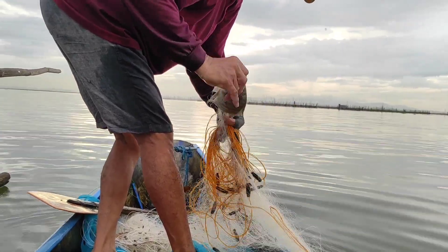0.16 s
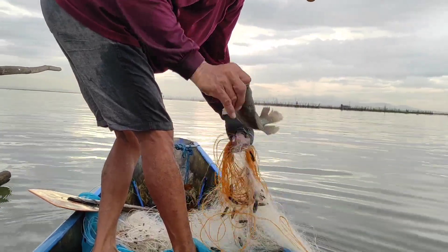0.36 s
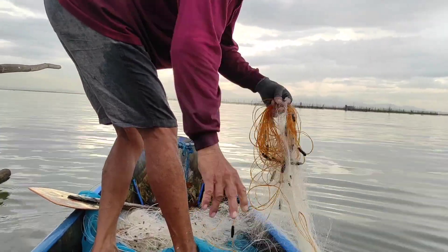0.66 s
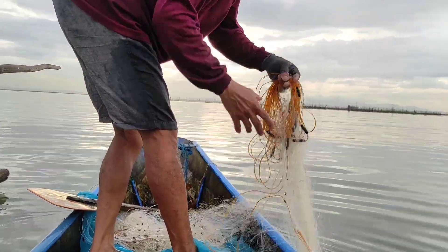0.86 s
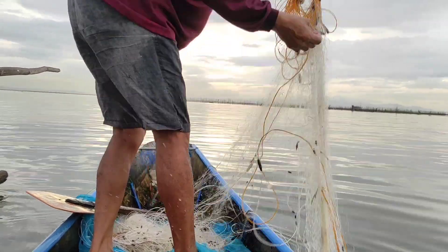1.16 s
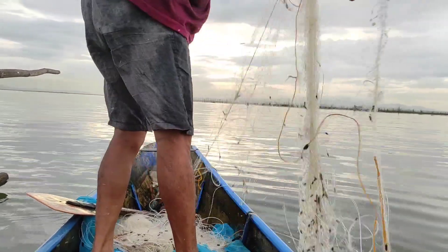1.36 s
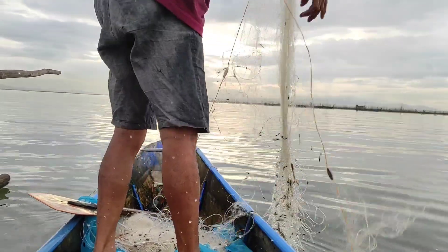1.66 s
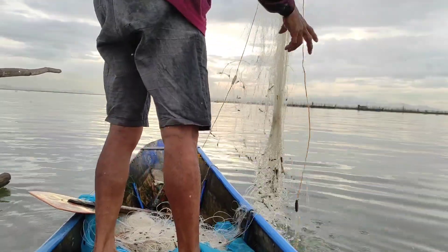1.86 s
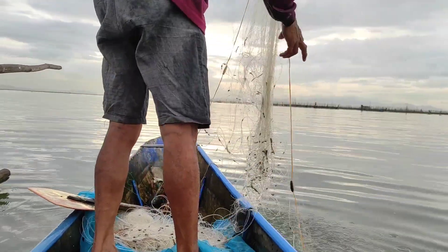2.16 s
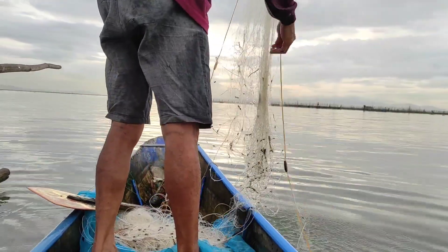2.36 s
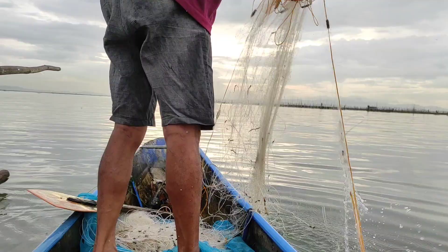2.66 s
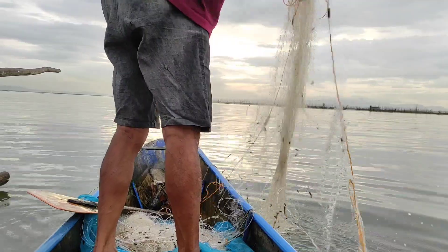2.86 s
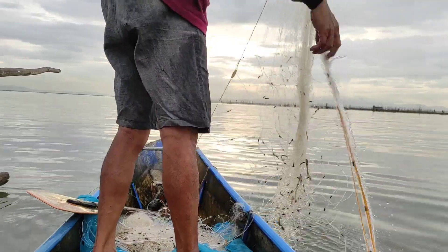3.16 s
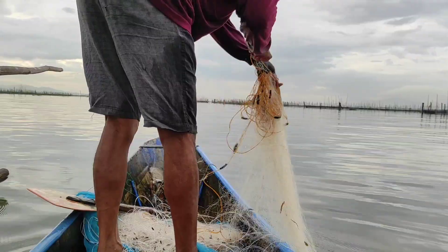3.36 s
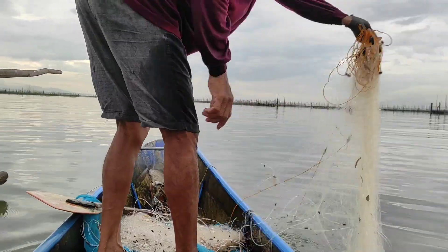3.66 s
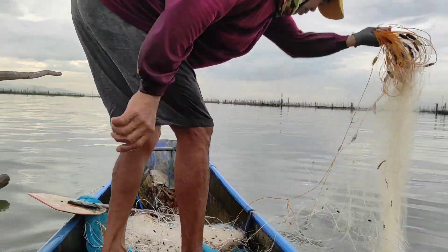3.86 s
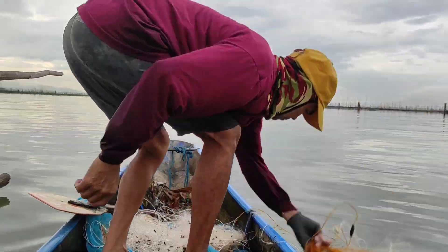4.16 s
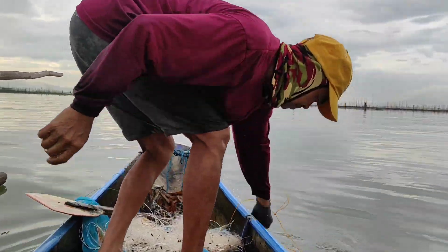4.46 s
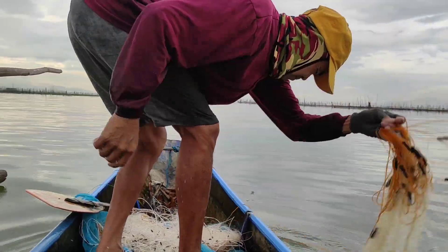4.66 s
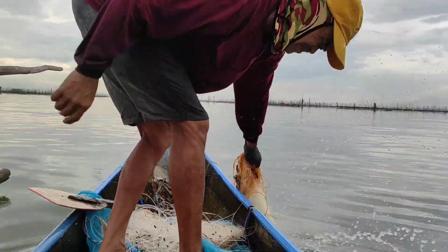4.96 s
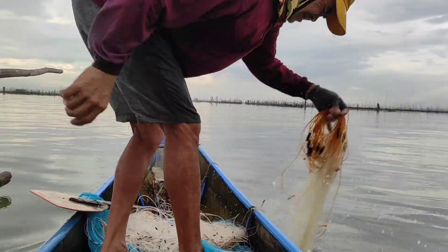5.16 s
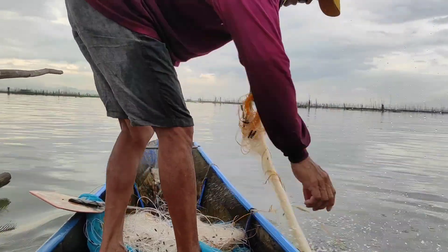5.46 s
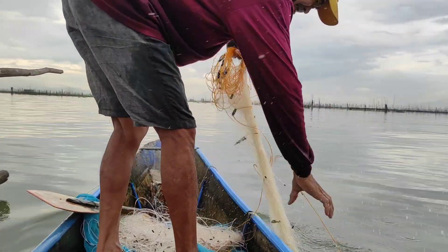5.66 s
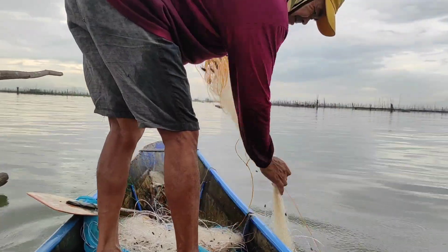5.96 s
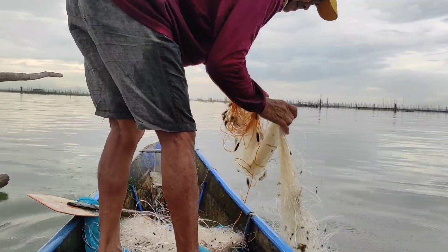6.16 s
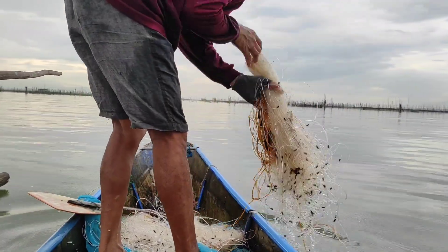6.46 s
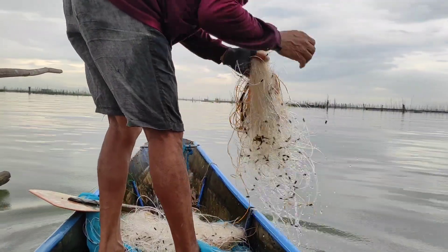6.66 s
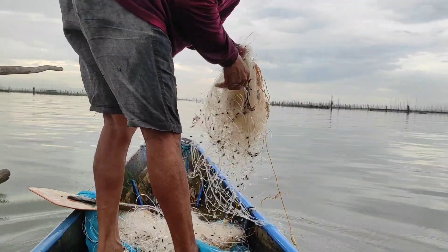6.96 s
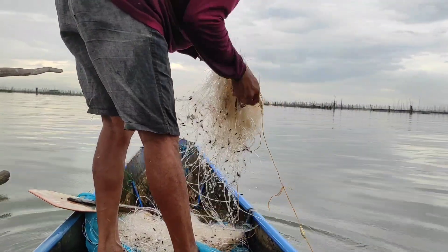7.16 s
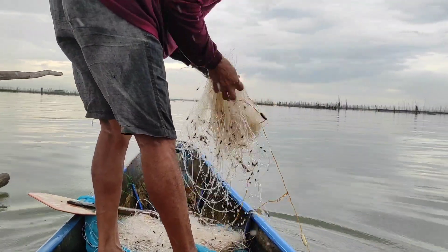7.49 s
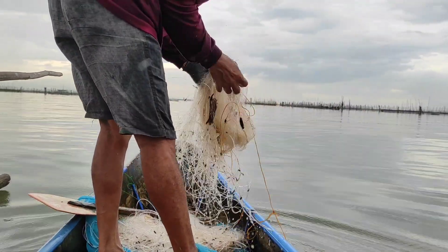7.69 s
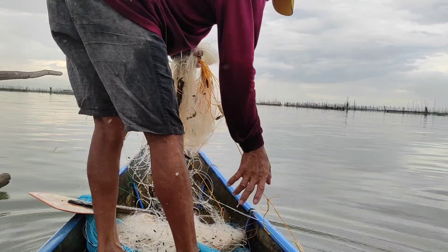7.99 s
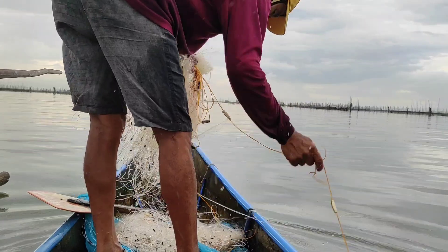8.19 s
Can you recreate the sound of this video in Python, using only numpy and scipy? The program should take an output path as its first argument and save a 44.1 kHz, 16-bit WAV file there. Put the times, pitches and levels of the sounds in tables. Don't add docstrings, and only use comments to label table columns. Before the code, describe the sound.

Outdoor close stereo pickup of a dripping net being hauled and rinsed. Sparse drops give way to sharp slaps, short pours and hollow bubble plops, then a lull of soft rumble, tiny drips and a barely audible far motor on the left. Crisp spray and hard little weight ticks return, thin briefly, and finish in crowded, wet splashing, with no reverberation.

```python
import sys
import numpy as np
from scipy import signal
from scipy.fft import rfft, irfft
from scipy.io import wavfile
from scipy.ndimage import uniform_filter1d

SR = 44100
rng = np.random.default_rng(int(sys.argv[2]) if len(sys.argv) > 2 else 0)


def linear_from_db(decibels):
    return 10 ** (np.asarray(decibels, float) / 20)


def waveform_to_disk(signal):
    frames = np.transpose(np.atleast_2d(signal))
    scaled = np.clip(frames, -1, 1) * 32767
    samples = np.round(scaled).astype(np.int16)
    wavfile.write(sys.argv[1], SR, samples)


N = 367353

# pitch_hz, level_db (per Hz)
RUMBLE_COLOUR = [(12, -23), (20, -17), (48, -6), (91, -4), (113, -9.5), (142, -3), (193, -2.5), (270, -7),
                 (459, -20.5), (527, -23), (3340, -69.5), (7730, -61), (16000, -57)]
RUMBLE_DB = -40.5
# pitch_hz, left_right_db
RUMBLE_LEAN = [(60, 4), (180, 5.5), (550, 5), (1650, -7), (4970, 11), (15000, -5)]
# pitch_hz, likeness (0 to 1)
LIKENESS = [(60, 0.93), (180, 0.92), (550, 0.68), (1650, 0.17), (4970, 0.17), (15000, -1.4)]
WHISTLE_HZ, WHISTLE_WIDTH_HZ, WHISTLE_DB = 7050, 300, -67

# start_s, flow_db, heaviness_db (body against spray), left_right_db
HAUL = [(0.0, -56.5, -12.5, -2), (0.5, -70, -7, -4), (0.86, -64, -3.5, -4), (1.02, -39, -6, -1),
        (1.55, -45.5, -1.5, -5), (1.9, -31.5, -4, -3.5), (2.25, -56, 7, -7.5), (2.64, -38.5, -6.5, -5),
        (3.1, -63.5, -0.5, -4.5), (3.57, -63.5, -1, -2.5), (4.36, -53, -2, 0), (4.82, -33.5, -6, -4),
        (5.26, -46, -5, 3.5), (6.12, -47.5, -4, -1.5), (6.52, -36.5, -3, -5), (6.84, -39.5, -7.5, -4),
        (7.55, -53.5, 4.5, -4.5), (8.33, -36, -7, -4.5)]
# pitch_hz, left_db, right_db
SPRAY_COLOUR = [(1470, -51, -64), (2860, -22, -17), (4180, -13, -13.5), (6410, -8, -5), (7100, -4, 1),
                (7740, -3, -0.5), (8660, 4.5, -13), (9490, -6.5, -15), (9630, -9.5, -22.5),
                (12000, -19.5, -25), (16900, -32, -31.5)]
# pitch_hz, level_db (per Hz)
BODY_COLOUR = [(200, -25.5), (400, -0.5), (650, -3.5), (950, -2), (1700, 0), (2800, 0.5), (4000, -6.5),
               (6000, -24)]
# start_s, left_delay_ms
NET_LAG = [
    (0.0, 0.0),
    (1.2, 0.03),
    (1.75, 0.11),
    (2.75, 0.2),
    (3.25, -0.11),
    (4.75, -0.04),
    (5.25, -0.17),
    (6.25, -0.11),
    (6.75, 0.0),
    (8.33, -0.02),
]

# start_s, level_db (peak), body_db (against level), left_right_db
DROPS = [(0.0185, -34.5, -10, -3), (0.0945, -37, -29, -8), (0.149, -43, -29, -6), (0.354, -40.5, -6, -3),
         (0.4194, -54, -20, -6), (0.5994, -45, -5, -4), (1.171, -15, -11, 2), (1.5748, -22, -14, -8),
         (1.6094, -14.5, -19, -8), (2.518, -19, -1, -10), (2.693, -30, -13, -3), (2.8134, -31, 6, -10),
         (3.148, -24, -14, -3.0), (4.3, -29, -20, 10), (4.322, -22.5, -23, 8), (4.9, -15, -9, 3),
         (5.1654, -16.5, -20, 3), (2.31, -17.5, -22, -13), (6.189, -30, -25, 3), (6.097, -28, -25, 0),
         (4.7631, -28, -15, -4.0), (4.8279, -37, -11, -12), (4.9725, -6, -20, 5.5), (5.138, -19.5, -10, 10),
         (5.2254, -12.5, -7, 8), (5.2424, -30, -29, -20), (5.282, -14, -22, 6), (5.3617, -25, -21, 4),
         (5.395, -30, -29, 7.0), (5.4114, -33, -21, 6.0), (5.419, -31, -18, 13), (5.47, -21.5, -21, -8),
         (5.512, -18, -21, 8), (5.838, -32, -15, -21), (6.402, -27, -16, 2.0), (6.525, -19, 6, -5),
         (6.631, -12, -12, -2.5), (6.932, -16, -6, -3), (7.121, -15, -12, 5), (7.482, -14, -6, 0),
         (7.7224, -39, 1, 2), (7.885, -16, 0, -2.5), (7.905, -16.5, -8, 14), (7.9884, -27, 6, -4),
         (8.0296, -24, 1, -2.0), (8.0676, -21, -8, 3), (8.096, -17.5, -25, -11), (8.2456, -15, -16, 2),
         (8.3153, -14.5, 0, -1.0)]
DROP_DB, DROP_T60_S = -12.5, 0.042
# start_s, spray_db, body_db, t60_s (time to fall 60 dB), left_right_db
TICKS = [(0.248, -29.5, -43, 0.058, -4), (0.637, -47, -76, 0.076, 3), (1.128, -29, -26.5, 0.06, 10),
         (1.345, -23.5, -33, 0.06, -2), (2.788, -26.5, -45, 0.024, -1), (2.924, -36, -50, 0.035, 1),
         (3.05, -27.5, -35.5, 0.039, -5), (3.198, -34.5, -58, 0.038, 2), (5.033, -15.5, -25.5, 0.021, 7),
         (5.113, -34, -41, 0.19, 5), (5.155, -32, -38, 0.058, 11), (5.195, -20.5, -38, 0.032, 11.5),
         (5.254, -26, -43, 0.005, 17.5), (5.445, -32.5, -49, 0.05, 14), (5.707, -40, -45, 0.012, 14),
         (5.959, -52, -49, 0.035, 2.2), (5.983, -19, -25, 0.058, -6), (6.199, -32.5, -57, 0.049, 3),
         (6.416, -17, -29.5, 0.072, -2.5), (6.768, -10, -25.5, 0.058, -5), (6.843, -16, -24.5, 0.068, -7),
         (7.311, -22, -31, 0.092, -6), (7.623, -30, -27.5, 0.17, -3), (7.963, -19, -37, 0.059, -6.5)]
TICK_RISE_S = 0.0012
# start_s, spray_db, body_db, t60_s
POURS = [(0.815, -25, -29, 0.23), (1.268, -34, -38.5, 0.76), (1.567, -30, -32.5, 0.28),
         (2.11, -27, -51, 0.3), (2.165, -20, -31, 0.16), (2.309, -30.5, -58, 0.22),
         (2.711, -24.5, -26, 0.17), (4.123, -38.5, -44.5, 0.18), (4.664, -31, -32.5, 0.71),
         (6.068, -33, -48, 0.082), (6.703, -21, -28, 0.23), (6.837, -24, -31, 0.13), (1.92, -36, -30, 0.15),
         (2.559, -34, -34.5, 0.075), (6.946, -19, -26.5, 0.13), (6.995, -14.5, -24, 0.18),
         (7.133, -23.5, -32, 0.21), (7.171, -24, -24, 0.14), (7.352, -17.5, -22, 0.18),
         (7.491, -19, -25.5, 0.12), (7.674, -25, -28, 0.23), (7.863, -28, -42, 1),
         (7.939, -30.5, -34.5, 0.77), (8.124, -28.5, -28.5, 0.55)]
POUR_RISE_S = 0.005
# start_s, spray_db, body_db, rise_s, t60_s
SURGES = [(0.836, -24.5, -22.5, 0.035, 0.098), (1.134, -28, -35.5, 0.039, 0.13),
          (1.609, -30.5, -33, 0.022, 0.32), (1.717, -16.5, -19, 0.018, 0.12),
          (1.842, -25.5, -30.5, 0.046, 0.075), (1.941, -17, -22, 0.008, 0.19),
          (1.99, -22.5, -28, 0.019, 0.32), (2.403, -25, -26.5, 0.006, 0.22),
          (2.447, -29.5, -42, 0.058, 0.38), (2.633, -22, -32.5, 0.015, 0.033),
          (2.609, -41, -32.5, 0.012, 0.044), (3.129, -36, -44.5, 0.019, 0.11), (4.311, -33, -36, 0.06, 1),
          (4.949, -21.5, -29, 0.064, 0.16), (5.204, -25.5, -33.5, 0.047, 0.33),
          (5.492, -32, -40, 0.045, 0.21), (5.733, -37, -39.5, 0.0049, 0.36),
          (6.386, -27, -26.5, 0.012, 0.059), (6.499, -29.5, -31, 0.029, 0.023),
          (6.619, -30.5, -33, 0.028, 0.68), (7.057, -17, -22.5, 0.021, 0.077),
          (7.41, -31, -37.5, 0.058, 0.36), (7.596, -50, -38.5, 0.067, 0.65),
          (7.819, -19.5, -26, 0.0065, 0.12), (8.23, -26.5, -30.5, 0.033, 0.12)]
# start_s, spray_db, body_db, left_right_db
SLAPS = [(0.998, -18.5, -24, -1), (1.026, -29, -49, 2), (1.091, -11.5, -24, -9), (1.404, -28.5, -57, 0),
         (1.44, -35, -47, 2.2), (1.512, -21, -31, -11), (1.702, -23, -25.5, -8), (1.788, -16.5, -57, -3),
         (2.279, -33.5, -50, -7), (2.332, -27.5, -33.5, -8), (3.025, -39.5, -42.5, -12),
         (3.073, -26, -36.5, 2.5), (3.345, -48.5, -46.5, -4), (3.647, -45, -49, -2),
         (3.682, -47.5, -54, -2), (3.967, -36.5, -63, -3), (4.183, -49, -42, -11), (4.534, -37, -59, 2),
         (5.167, -23.5, -33, 4), (5.686, -38.5, -53, 6), (6.314, -21.5, -27, 2), (6.33, -15.5, -23, -5),
         (6.594, -19.5, -24, -4), (6.865, -14.5, -24, -3), (7.242, -32, -33.5, -7), (7.28, -24, -33.5, -3),
         (7.43, -19, -26.5, -1), (7.595, -22.5, -52, -7), (7.759, -18, -32, -3.5), (8.142, -48, -43, -6)]
SLAP_RISE_S, SLAP_T60_S, SLAP_HARDNESS = 0.0024, 0.091, 0.055
LEAD = 0.4
CRACK_DB, CRACK_S = 6.5, 0.0025
HIT_DB = 26

# start_s, level_db (peak), pitch_hz
BLIPS = [(0.849, -21.5, 950), (7.822, -13.5, 2020), (1.248, -27.5, 1510), (1.363, -22.5, 1240),
         (1.73, -27, 2220), (1.928, -13, 1140), (1.947, -11, 1105), (1.962, -11.5, 1455), (2.33, -25, 1410),
         (2.407, -23, 1870), (2.407, -25, 1410), (2.54, -29, 1240), (2.614, -14, 2250), (2.718, -26, 2830),
         (2.72, -23, 1230), (7.622, -19, 1470), (4.551, -27, 1200), (1.091, -11.5, 2760), (5.85, -22, 2260),
         (6.413, -22, 2860), (6.597, -30, 1710), (6.658, -25, 1720), (7.019, -24, 1780), (7.056, -16, 2620),
         (7.056, -26, 1670), (7.362, -27, 1610), (7.673, -25, 2230), (7.678, -26, 2860), (8.169, -26, 1840),
         (8.315, -20.5, 1200), (5.742, -42, 1570), (5.954, -31, 3000), (6.0895, -38, 1150),
         (6.148, -33, 2670), (4.0645, -50, 1990), (4.089, -49, 2240), (4.119, -42, 1600),
         (4.125, -50, 2570), (4.19, -42, 2300), (4.19, -37, 3400), (5.805, -28, 3280), (2.622, -16, 3000),
         (2.63, -23, 2400), (2.535, -36, 2620), (2.335, -36, 1075), (7.18, -32, 2300), (1.73, -19, 1500)]
# start_s, level_db (peak), pitch_hz
DRIPS = [(1.091, -10.5, 2070), (1.129, -20.5, 1600), (1.197, -30.5, 2920), (1.224, -34, 680),
         (1.32, -26.5, 1120), (1.488, -36, 1480), (1.49, -29, 651), (1.514, -25, 960), (1.535, -29, 663),
         (1.575, -38, 1430), (1.611, -35, 1510), (1.832, -30, 1360), (1.858, -37, 617),
         (2.327, -19.5, 1830), (2.52, -30, 1780), (2.565, -45, 1320), (2.697, -29, 3000),
         (2.771, -39, 1080), (2.812, -35, 1220), (3.006, -41, 1150), (3.03, -36, 780), (3.149, -45, 1860),
         (4.236, -47, 1090), (4.318, -46, 1590), (4.479, -36, 695), (4.526, -31, 860), (4.553, -30, 1840),
         (4.667, -27.5, 1230), (4.682, -30, 930), (4.761, -43, 1520), (4.819, -38, 647), (4.945, -43, 1310),
         (4.98, -24, 1060), (5.065, -30, 2370), (5.157, -10, 3060), (5.232, -30, 1780), (5.593, -39, 1540),
         (5.704, -39, 1840), (5.758, -32, 1410), (5.804, -35, 2420), (6.402, -18, 2730), (6.527, -37, 1190),
         (6.63, -18, 2750), (6.705, -22, 750), (7.14, -48, 2540), (7.177, -22, 1750), (7.434, -51, 2560),
         (7.496, -23, 1900), (7.723, -36, 3170), (7.761, -25, 2720), (7.823, -18, 2700), (7.885, -42, 970),
         (7.904, -27, 2970), (7.941, -25, 3100), (7.989, -23, 2860), (8.031, -33, 1860), (8.123, -26, 960),
         (8.155, -21, 760), (8.245, -21.5, 2700), (8.319, -34, 2320)]
# start_s, level_db (peak), pitch_hz
PLOPS = [(1.315, -29, 680), (1.447, -28, 736), (1.508, -25, 680), (1.55, -30.5, 612), (1.703, -15.5, 657),
         (1.724, -18, 656), (1.738, -22.5, 373), (1.76, -30, 770), (1.875, -33, 650), (1.923, -19.5, 560),
         (1.936, -19, 615), (1.958, -23, 600), (1.95, -27, 322), (1.989, -24, 820), (2.028, -25, 717),
         (2.407, -20, 840), (2.408, -26, 347), (2.716, -27.5, 710), (4.602, -33, 710), (4.978, -32, 580),
         (5.32, -36, 980), (5.96, -36, 525), (6.325, -29, 394), (6.354, -29, 930), (6.461, -31, 920),
         (6.766, -17.5, 443), (7.124, -26.5, 710), (7.347, -21.5, 923), (7.621, -19, 843),
         (8.037, -34.5, 700), (8.141, -14.5, 942), (8.19, -26, 550)]
PLOP_T60_S, BLIP_T60_S, DRIP_T60_S, SWELL_S = 0.04, 0.03, 0.024, 0.006
DAMPING = 0.15
WOBBLE = 0.35

# start_s, firings_per_s, level_db
ENGINE = [
    (3.14, 29.1, -80),
    (3.22, 29.15, -62.5),
    (3.7, 29.4, -62.5),
    (4.0, 29.75, -62.5),
    (4.25, 29.9, -63),
    (4.5, 29.9, -80),
]
# pitch_hz, width_hz, level_db
EXHAUST = [(500, 60, -5), (590, 100, -1), (708, 40, 2.5), (820, 60, -9), (1025, 45, -9), (1150, 50, -9)]
CHUFF_HZ, CHUFF_WIDTH_HZ, CHUFF_DB = 1290, 1200, -12.5

WEAK_MID, WEAK_TOP = 0.5, 0.85
BINS = np.fft.rfftfreq(4096, 1 / SR)


def evened(x):
    return x / np.sqrt(np.mean(x ** 2) + 1e-20)


def read(points, hz, axis=1):
    table = np.transpose(points)
    return np.interp(np.log(hz + 1), np.log(table[0] + 1), table[axis])


def curve(rows, axis):
    table = np.transpose(rows)
    return np.interp(np.arange(N) / SR, table[0], table[axis])


def add(mix, s, sound):
    part = mix[..., round(s * SR):][..., :sound.shape[-1]]
    part += sound[..., :part.shape[-1]]


def sides(pan_db):
    return linear_from_db(np.array([pan_db / 2, -pan_db / 2]))


def colour(x, db):
    log_gain = np.log(linear_from_db(np.concatenate([db, db[-2:0:-1]])))
    taps = np.fft.ifft(np.exp(np.conj(signal.hilbert(log_gain)))).real[:2048]
    return signal.oaconvolve(x, taps)[:N]


def resonance_db(centre_hz, width_hz):
    return -20 * np.log10(1 + ((BINS - centre_hz) / width_hz) ** 2)


def pair(size):
    first, other = size * rng.standard_normal((2, N))
    same = np.clip(read(LIKENESS, np.fft.rfftfreq(N, 1 / SR)), 0, 1)
    second = irfft(same * rfft(first) + np.sqrt(1 - same ** 2) * rfft(other), N)
    return first, second


def rumble():
    hz_db, lean_db = read(RUMBLE_COLOUR, BINS), read(RUMBLE_LEAN, BINS)
    swell = evened(uniform_filter1d(rng.standard_normal(N), size=9000))
    left, right = pair(linear_from_db(1.8 * swell))
    out = np.array([colour(left, hz_db + lean_db / 2), colour(right, hz_db - lean_db / 2)])
    return linear_from_db(RUMBLE_DB + 1.0) * evened(out)


def whistle():
    db = resonance_db(WHISTLE_HZ, WHISTLE_WIDTH_HZ)
    hiss = np.array([colour(x, db) for x in rng.standard_normal((2, N))])
    return sides(-8)[:, None] * linear_from_db(WHISTLE_DB) * evened(hiss)


def droplets(per_s, spread_db, mist):
    sizes = linear_from_db(spread_db * np.minimum(rng.exponential(1, N), 4))
    drops = sizes * (rng.random(N) < per_s / SR)
    drops = signal.lfilter([1], [1, -0.97], drops)
    return evened(drops) + mist


def patchy(x, patch_db):
    z = signal.stft(x, nperseg=512, noverlap=384)[2]
    patches = rng.standard_normal(z.shape[1:])
    patches = uniform_filter1d(patches, size=6, axis=0)
    patches = evened(uniform_filter1d(patches, size=12, axis=1))
    return evened(signal.istft(z * linear_from_db(patch_db * patches), nperseg=512, noverlap=384)[1][:, :N])


def clumps(clump_db):
    smooth = uniform_filter1d(rng.standard_normal(N), size=900)
    return linear_from_db(clump_db * evened(uniform_filter1d(smooth, size=500)))


def ring(t, hz, t60, start, glide=2.03):
    turns = hz * (0.97 * t + glide * t ** 2) + start
    return linear_from_db(-60 * t / t60) * np.minimum(t / 0.0019, 1) * np.sin(2 * np.pi * turns)


def gurgle(per_s, spread_db):
    out, t = np.zeros((2, N)), np.arange(1200) / SR
    for when, size, pitch, place, start in rng.random((round(per_s * N / SR), 5)):
        hz = 640 * 7.5 ** pitch
        level_db = spread_db * min(-np.log(size + 1e-9), 2.1) + read(BODY_COLOUR, hz)
        gains = sides(9.8 + 13.0 * (place - 0.5))[:, None] * linear_from_db(level_db)
        add(out, when * N / SR, gains * ring(t, hz, 59.0 / hz ** 0.85, start))
    return evened(out)


def splashes():
    lean_db = curve(HAUL, axis=3)
    drops = [(s, a + DROP_DB, a + b + DROP_DB, TICK_RISE_S, DROP_T60_S, pan) for s, a, b, pan in DROPS]
    ticks_ = [(s, a, b, TICK_RISE_S, t60, pan) for s, a, b, t60, pan in TICKS]
    pours = [(s, a, b, POUR_RISE_S, t60, lean_db[round(s * SR)]) for s, a, b, t60 in POURS]
    surges = [(s, a, b, rise, t60, lean_db[round(s * SR)]) for s, a, b, rise, t60 in SURGES]
    slaps = [(s, a, b, SLAP_RISE_S, SLAP_T60_S, pan) for s, a, b, pan in SLAPS]
    return drops + ticks_ + pours + surges + slaps


def splash_shape(t, rise, t60):
    rise = np.clip(rise, 0.0006, 0.05)
    gather = np.clip(0.56 + 0.24 * t / rise, 0.3, 1) * np.exp(np.minimum(t, 0) / (LEAD * rise))
    drain = linear_from_db(-60 * np.maximum(t - rise, 0) / np.clip(t60, 0.008, 0.6))
    crack_db = CRACK_DB * np.exp(-rise / 0.002 - abs(t - rise) / CRACK_S)
    return gather * drain * linear_from_db(crack_db - 1.0)


def placed(x):
    at = np.arange(N)
    return np.array([np.interp(at - curve(NET_LAG, axis=1) * SR / 1000, at, x[0]), x[1]])


def water():
    fine = pair(droplets(per_s=900, spread_db=2.9, mist=2.0))
    fine = evened(np.array([colour(fine[k], read(SPRAY_COLOUR, BINS, axis=k + 1)) for k in (0, 1)]))
    heavy = pair(droplets(per_s=400, spread_db=3.2, mist=1.7))
    heavy = evened(np.array([colour(x, read(BODY_COLOUR, BINS)) for x in heavy]))
    fine, heavy = patchy(fine, patch_db=2.5), patchy(heavy, patch_db=2.5)
    heavy = evened(heavy + 0.62 * gurgle(per_s=450, spread_db=5.0))

    flow_db, lean_db = curve(HAUL, axis=1) + 0.6, curve(HAUL, axis=3)
    heavy_db = flow_db + curve(HAUL, axis=2)
    fine_power = (sides(lean_db) * clumps(1.8) * linear_from_db(flow_db)) ** 2
    heavy_power = (sides(0.4 * lean_db + 1.5) * clumps(2.2) * linear_from_db(heavy_db)) ** 2
    early = 0.015
    t = np.arange(SR // 4) / SR - early
    for s, spray_db, body_db, rise, t60, pan_db in splashes():
        shape = splash_shape(t, rise, t60)
        spray = sides(pan_db)[:, None] * linear_from_db(spray_db - 0.5) * shape
        body = sides(0.23 * pan_db + 0.5)[:, None] * linear_from_db(body_db - 1.5) * shape
        add(fine_power, s - early, spray ** 2)
        add(heavy_power, s - early, body ** 2)
    return fine * np.sqrt(fine_power) + placed(heavy * np.sqrt(heavy_power))


def ticks():
    hits = np.zeros((2, N))
    rows = [(s, db, 1 - t60 / 0.06, pan) for s, db, _, t60, pan in TICKS]
    rows += [(s, db + DROP_DB, 0.4, pan) for s, db, _, pan in DROPS]
    rows += [(s, db, SLAP_HARDNESS, pan) for s, db, _, pan in SLAPS]
    for s, spray_db, hardness, pan_db in rows:
        click = sides(1.83 * pan_db)[:, None] * linear_from_db(spray_db + HIT_DB) * max(hardness, 0)
        add(hits, s + 0.6 * TICK_RISE_S, click)
    lift_db = np.clip(2.0 * np.log2(7000 / (BINS + 1)), 0, 12.0)
    return np.array([colour(hits[k], read(SPRAY_COLOUR, BINS, axis=k + 1) + lift_db) for k in (0, 1)])


def bubbles():
    out, t = np.zeros((2, N)), np.arange(SR // 6) / SR
    for rows, ring_s in ((BLIPS, BLIP_T60_S), (DRIPS, DRIP_T60_S), (PLOPS, PLOP_T60_S)):
        for (s, peak_db, hz), (start, rush, place) in zip(rows, rng.random((len(rows), 3))):
            size = min(1300 / hz, 1) ** 0.8
            t60 = size * ring_s * linear_from_db(-DAMPING * (peak_db + 25))
            swell = np.sin(np.pi / 2 * np.minimum(t / (size * SWELL_S), 1))
            main = ring(t, hz, t60, start, glide=6 * rush / size)
            second = ring(t, hz * (1.12 + 0.3 * place), 0.7 * t60, rush, glide=9)
            voice = swell * (main + WOBBLE * second)
            gains = sides(3.9 + 14.0 * (place - 0.5))[:, None] * linear_from_db(peak_db + 6.0)
            add(out, s - 0.0005, gains * voice)
    return out


def engine():
    turns = np.cumsum(curve(ENGINE, axis=1)) / SR + 0.55
    firings = np.diff(np.floor(turns), prepend=0) * linear_from_db(1.3 * rng.standard_normal(N))
    chuff = (0.4 + np.exp(-4 * (turns % 1))) * rng.standard_normal(N)
    chuff = linear_from_db(CHUFF_DB) * evened(colour(chuff, resonance_db(CHUFF_HZ, CHUFF_WIDTH_HZ)))
    puff = np.zeros(SR // 8)
    t = np.arange(SR // 12) / SR
    for hz, width, db in EXHAUST:
        fade = (t * width) ** 0.058 * np.exp(-np.pi * width * t)
        add(puff, hz % 560 / 15000, linear_from_db(db) * fade * np.sin(2 * np.pi * hz * t))
    putter = evened(signal.oaconvolve(firings, puff)[:N])
    return sides(19.5)[:, None] * linear_from_db(curve(ENGINE, axis=2)) * (putter + chuff)


def scene():
    return rumble() + whistle() + water() + ticks() + placed(bubbles()) + engine()


def drop_weak_bands(x):
    hz, _, z = signal.stft(x, SR, nperseg=1024, noverlap=768)
    power = (abs(z) ** 2).sum(0)
    usual = np.exp(uniform_filter1d(np.log(power + 1e-20).mean(1), size=5))
    power = power / usual[:, None]
    band = uniform_filter1d(uniform_filter1d(power, size=4, axis=0), size=4, axis=1)
    band = band[np.arange(len(hz)) // 4 * 4][:, np.arange(band.shape[1]) // 4 * 4]
    share = WEAK_TOP * (hz > 9700) + WEAK_MID * (abs(hz - 4700) < 1800)
    weak = band < share[:, None] * uniform_filter1d(band, size=30, axis=0)
    treble = power[hz > 2000].mean(0)
    no_onset = treble < 4 * np.roll(treble, 4)
    weak = (uniform_filter1d(weak * 1.0, size=3, axis=1) > 0.3) & no_onset
    return signal.istft(z * ~weak, SR, nperseg=1024, noverlap=768)[1][:, :N]


def band_limit(x):
    return signal.sosfilt(signal.butter(12, 16480, fs=SR, output="sos"), x)


def record(dry):
    limited = 1.2 * np.tanh(drop_weak_bands(dry) / 1.2)
    edge = signal.firwin(301, 16050, window=("kaiser", 9), fs=SR)[None]
    mix = signal.oaconvolve(limited, edge, "same")
    return band_limit(mix)


dry = scene()
out = record(dry)
waveform_to_disk(out)
```